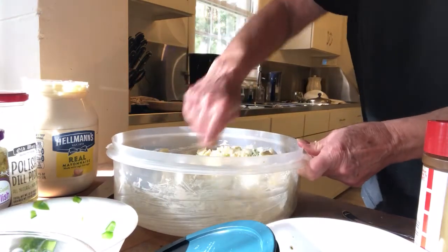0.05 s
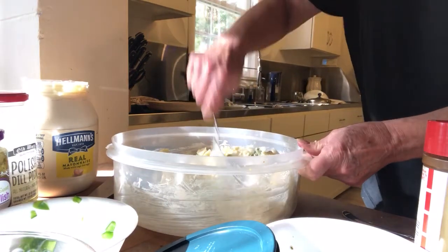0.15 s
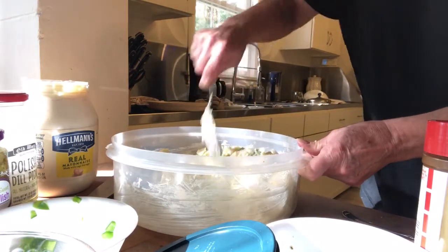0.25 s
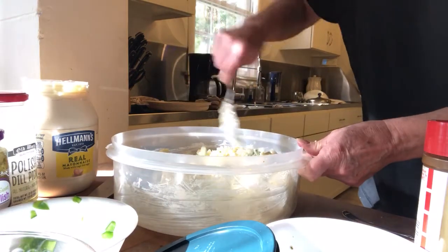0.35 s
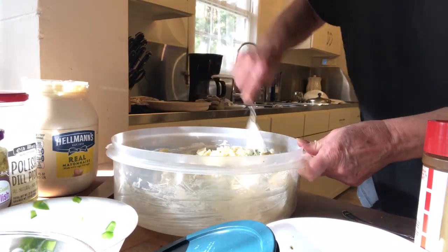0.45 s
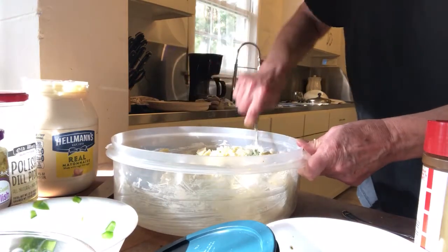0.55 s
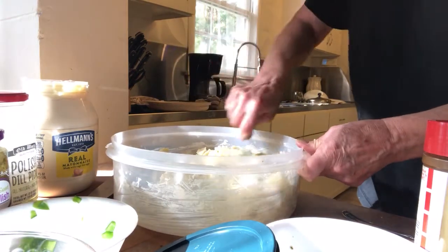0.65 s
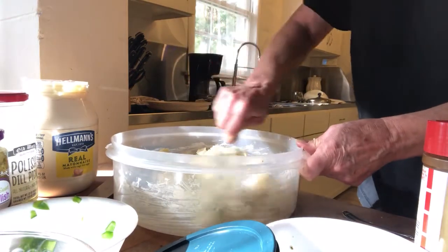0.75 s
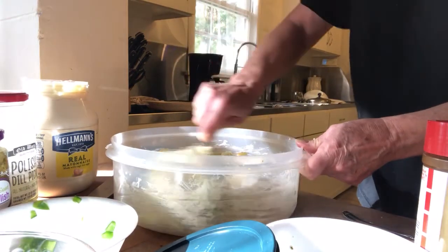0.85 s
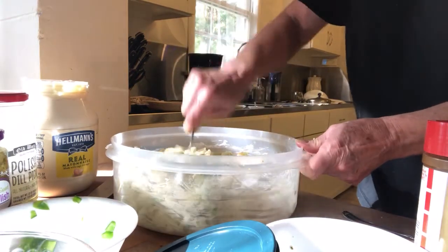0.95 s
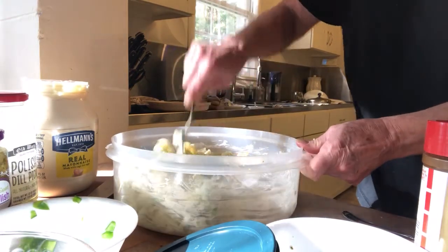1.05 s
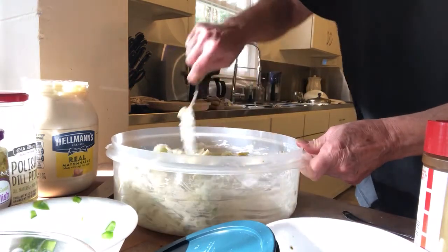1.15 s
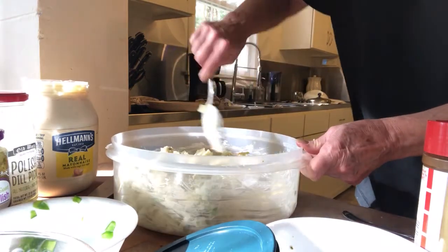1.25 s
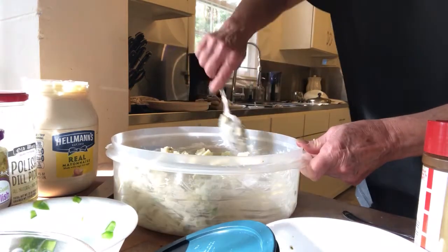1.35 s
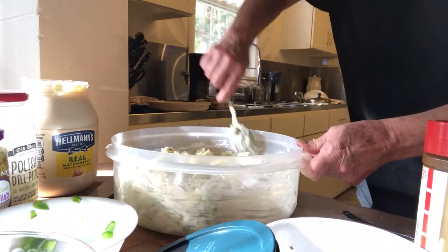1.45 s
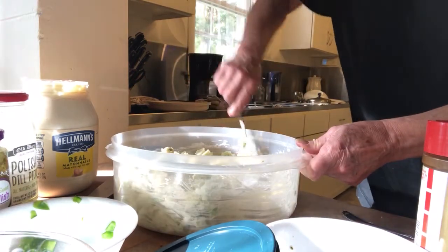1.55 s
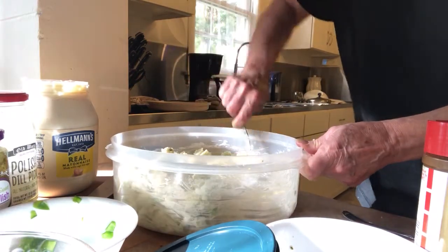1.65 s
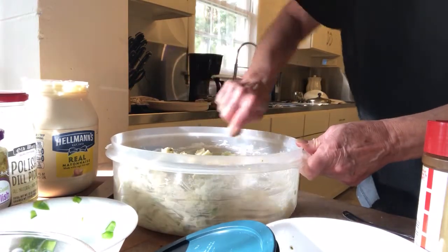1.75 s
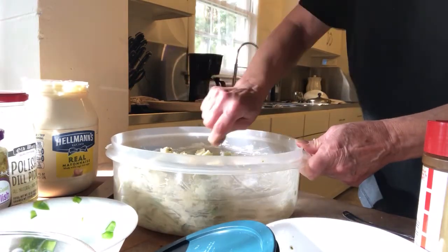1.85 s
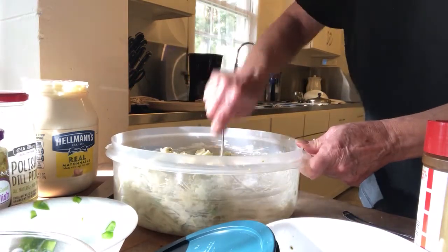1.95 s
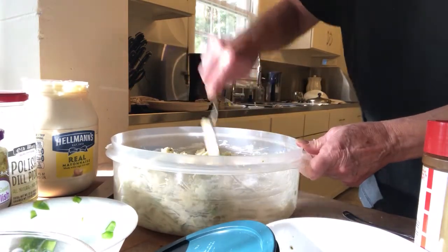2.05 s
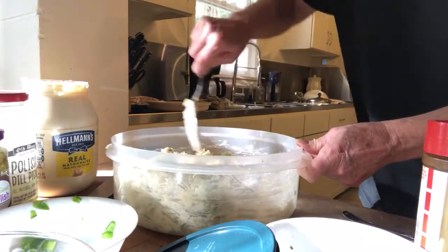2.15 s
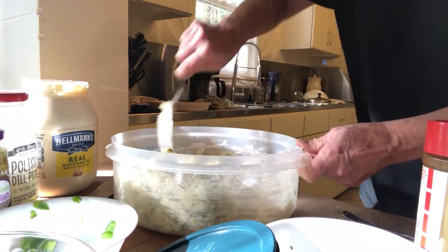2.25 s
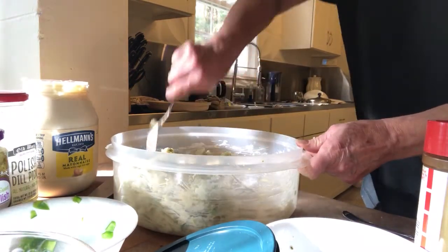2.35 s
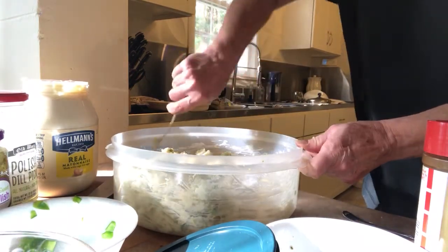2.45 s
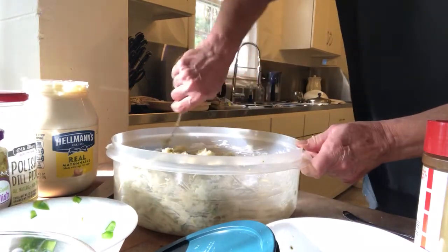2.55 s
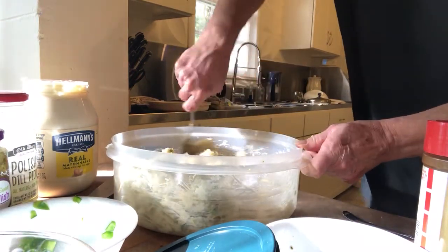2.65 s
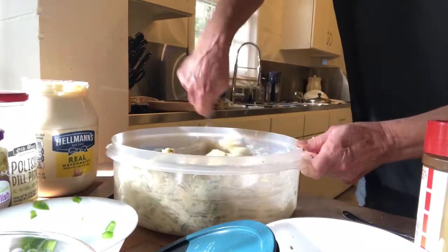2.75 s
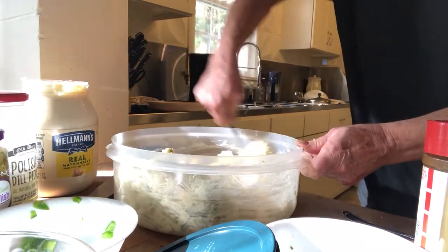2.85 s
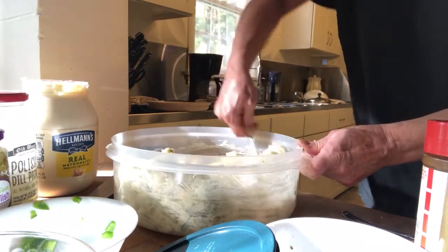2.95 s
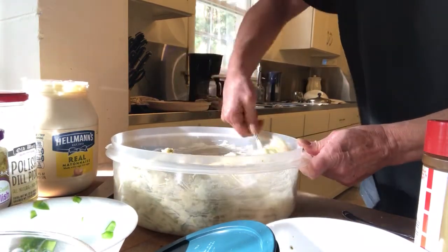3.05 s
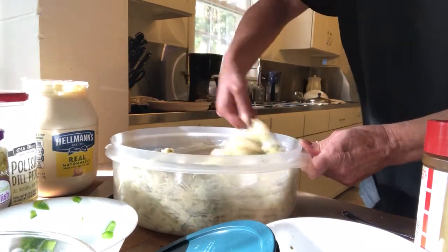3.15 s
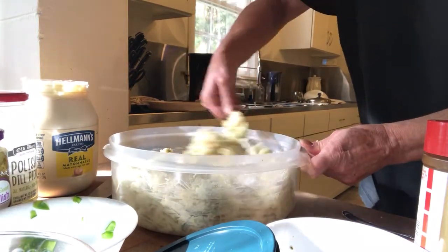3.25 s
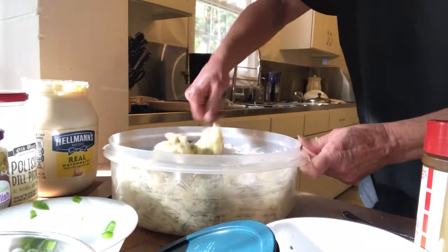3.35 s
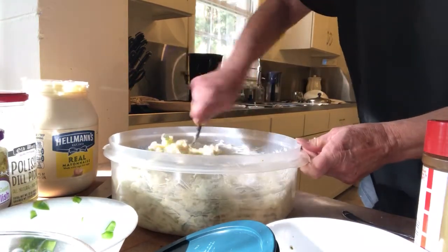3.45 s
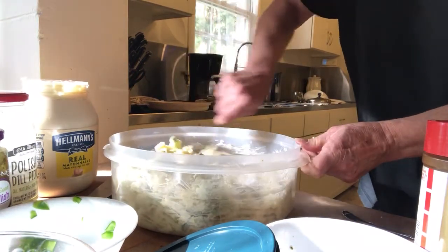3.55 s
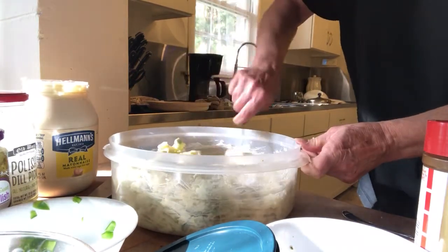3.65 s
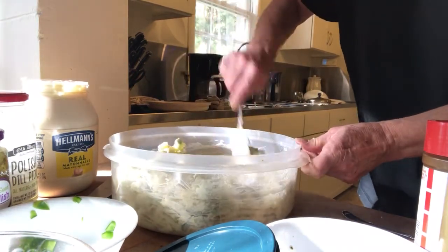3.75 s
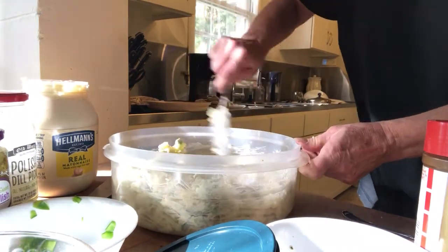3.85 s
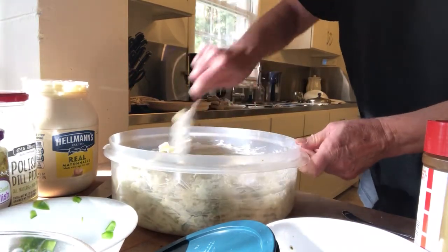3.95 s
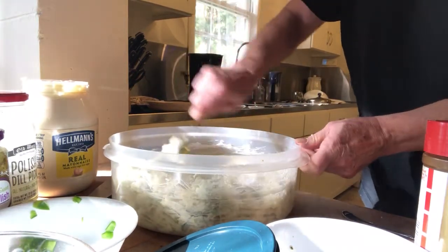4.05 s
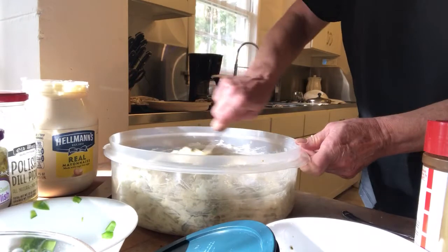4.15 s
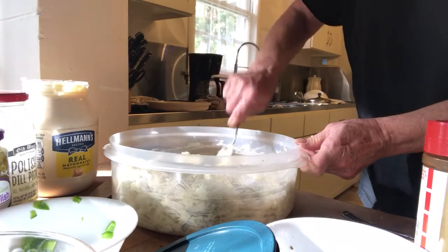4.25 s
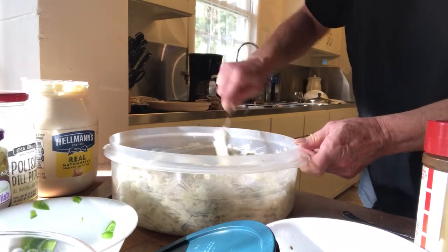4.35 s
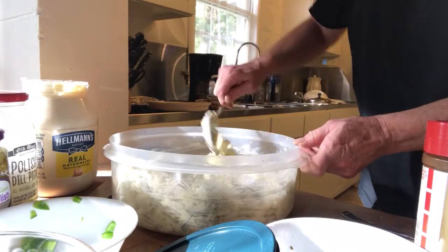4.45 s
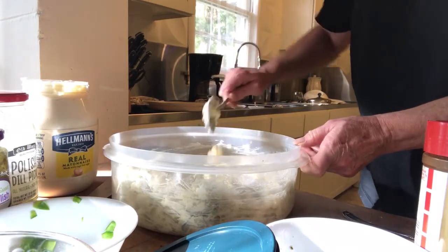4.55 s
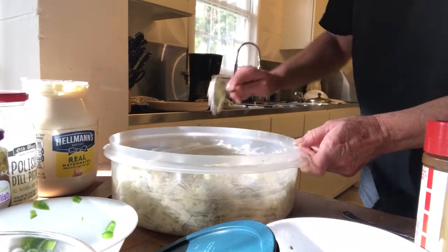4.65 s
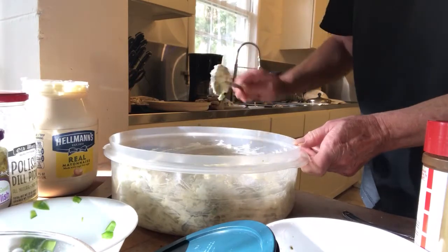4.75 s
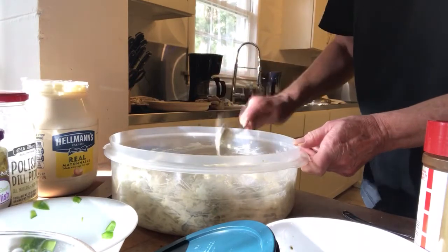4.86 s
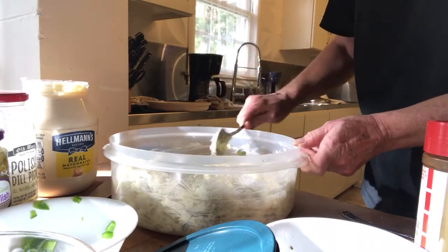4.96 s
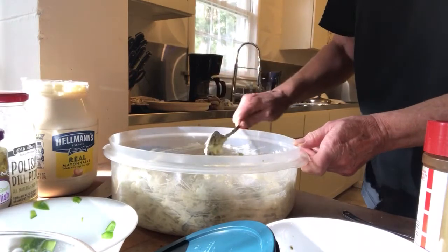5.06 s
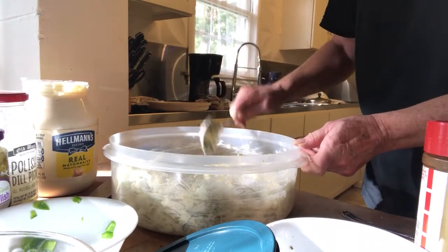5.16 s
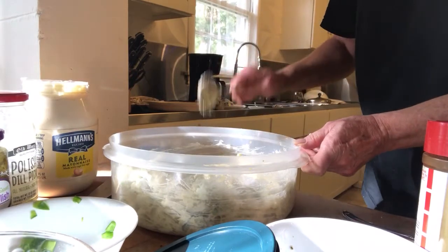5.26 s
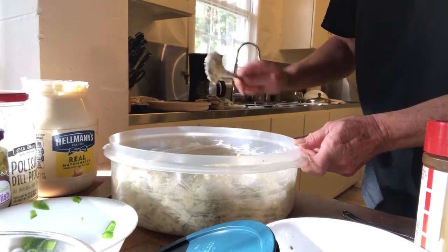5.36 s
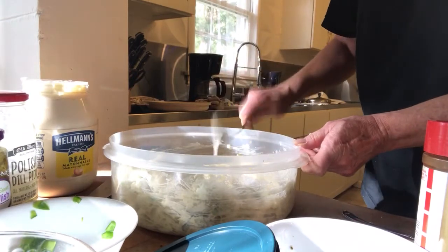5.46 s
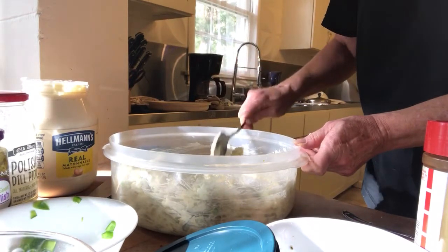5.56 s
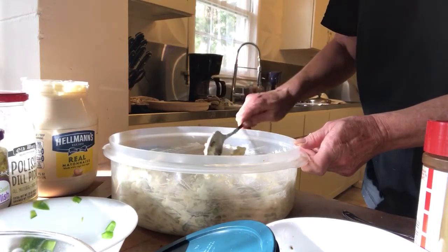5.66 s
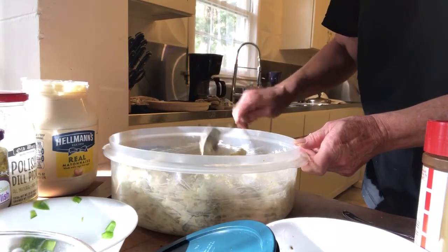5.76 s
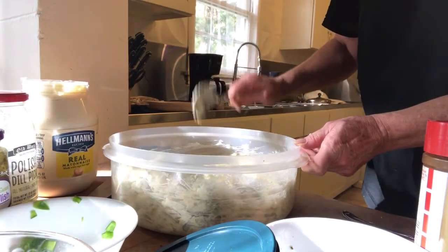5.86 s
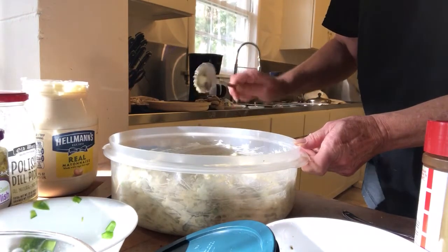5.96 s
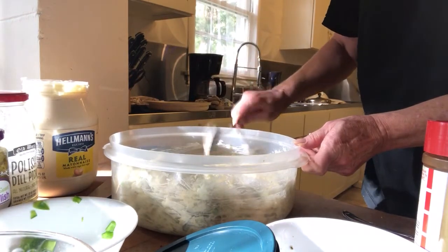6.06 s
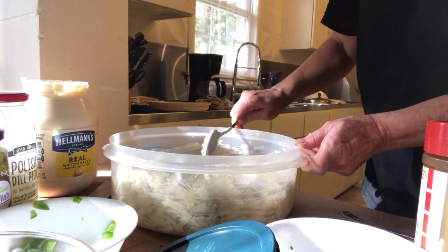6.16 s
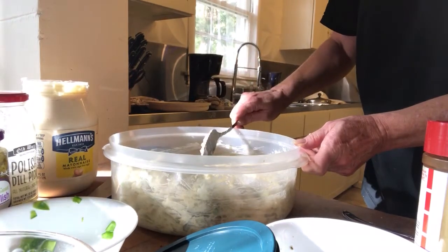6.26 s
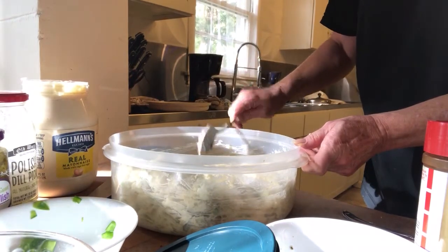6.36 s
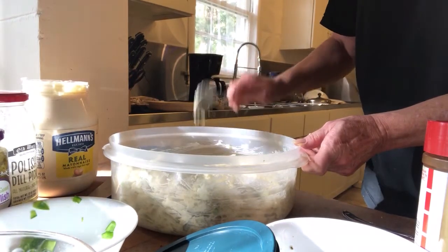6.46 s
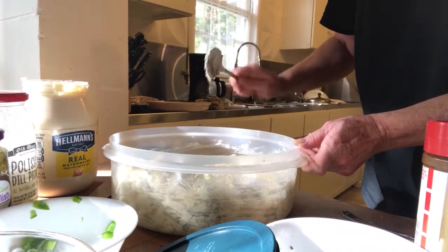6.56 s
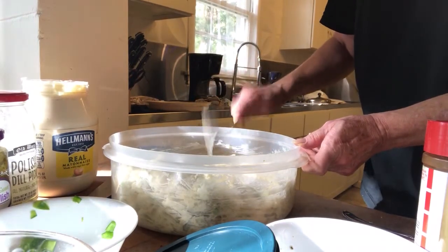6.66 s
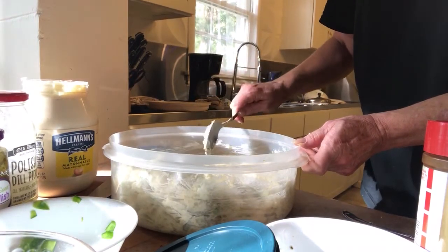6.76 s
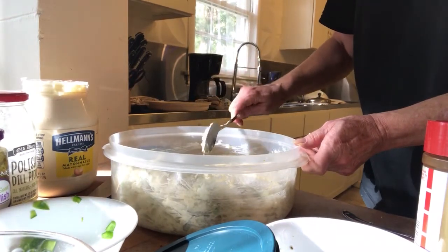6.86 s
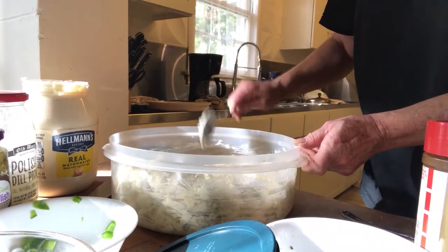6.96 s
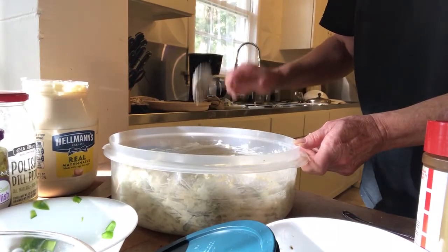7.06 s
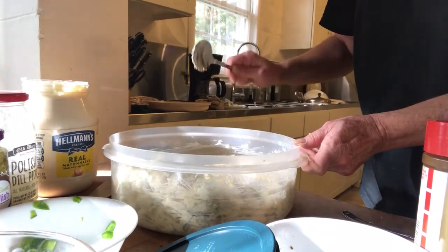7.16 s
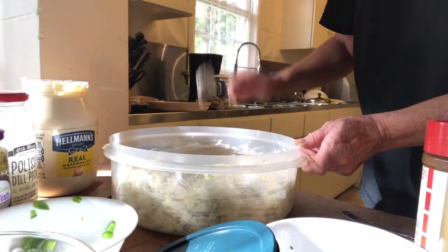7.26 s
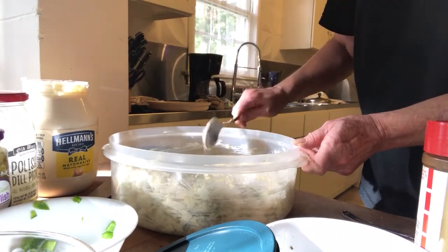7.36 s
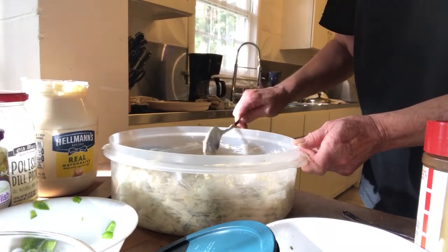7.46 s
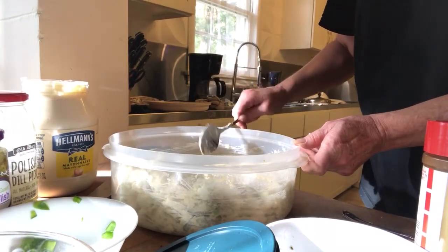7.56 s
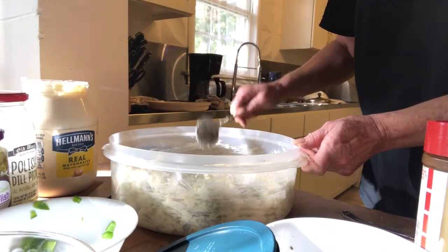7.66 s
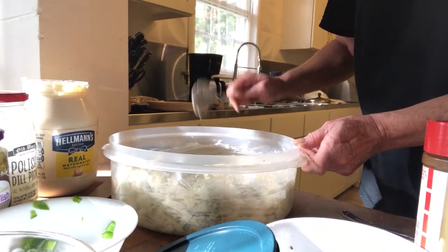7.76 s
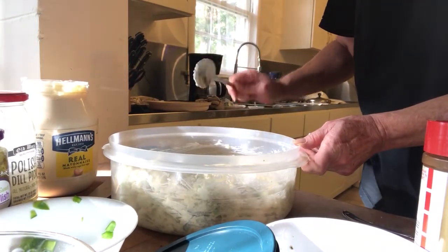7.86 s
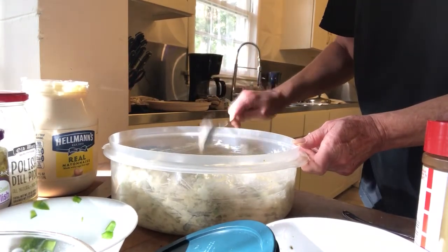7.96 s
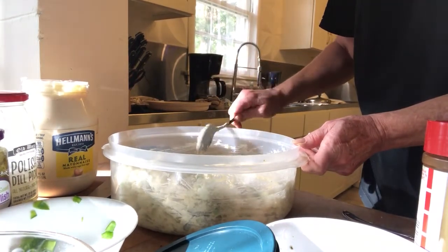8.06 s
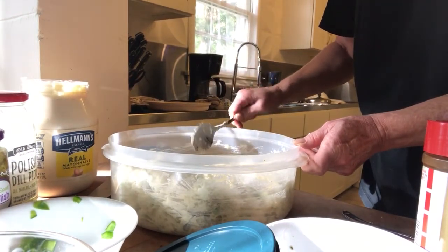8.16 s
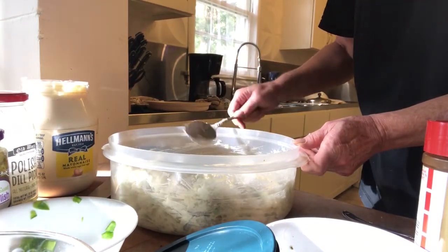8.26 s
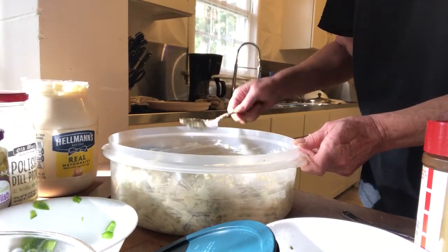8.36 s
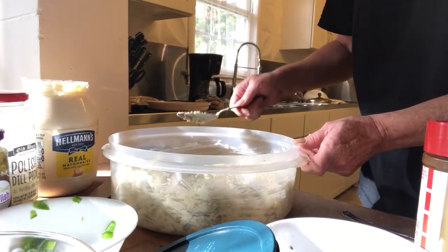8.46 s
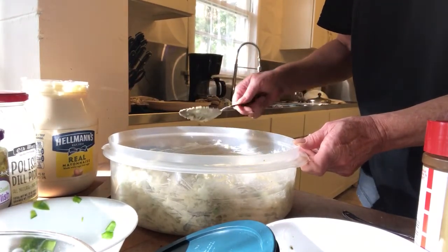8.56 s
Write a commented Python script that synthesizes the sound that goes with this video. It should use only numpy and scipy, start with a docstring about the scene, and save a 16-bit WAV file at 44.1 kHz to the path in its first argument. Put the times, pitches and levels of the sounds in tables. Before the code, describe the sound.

Close by in a kitchen, moist salad is stirred with quiet squishes and sticky smacks, and a metal spoon now and then clacks against the plastic bowl. About halfway through, the stirring stops and six firm, hollow knocks follow as the spoon strikes the rim, most with a light rebound. Each has a short room echo, over soft room air and a low electrical hum.

```python
"""In a kitchen, a metal spoon folds a wet salad in a large plastic bowl steadied by hand on the counter.
The spoon clacks and drags against the bowl's wall while the food squelches and pops. Then the spoon is
knocked clean on the rim six times, bouncing after most blows. Each touch makes the bowl ring briefly.
The hard room echoes and a faint hiss trails each sound, over soft room air and an appliance's hum."""
import sys
import numpy as np
from scipy import signal
from scipy.fft import rfft, irfft, next_fast_len
from scipy.io import wavfile

SR = 44100
rng = np.random.default_rng(int(sys.argv[2]) if len(sys.argv) > 2 else 0)


def wav_out(sig):
    """Save sig, one row per channel (or a flat mono array), as 16-bit PCM at SR to the path in sys.argv[1]."""
    wavfile.write(sys.argv[1], SR, np.round(np.clip(np.atleast_2d(sig).T, -1, 1) * 32767).astype(np.int16))


N = 379127
KNOCK_HZ, CLACK_HZ, CRACK_HZ = 750, 1700, 4200   # the bowl's low, middle and high voices

# Short tones of the full bowl; wider ones die sooner: (pitch [Hz], width [Hz], relative level [dB])
BOWL_TONES = [(320.4, 148, -14), (363.2, 200, -14.5), (510.8, 210, -22.5), (706.3, 179, -14),
              (789, 210, -12), (1187, 165, -19), (1445, 180, -16), (1583, 250, -13.5), (2215, 360, -13.5),
              (2460, 480, -14), (3202, 650, -19), (4230, 860, -25)]
# Longer rings of bowl and counter: (pitch [Hz], relative level [dB], time to fade by 60 dB [s])
LONG_RINGS = [(56, -60.5, 0.25), (86, -36.5, 0.31), (136.4, -43, 0.53), (237.7, -41, 0.37),
              (296, -37, 0.17), (769, -37.5, 0.19), (1260, -44.5, .2), (1504, -46.5, .22)]
# The sharp crack right where the spoon lands: (frequency [Hz], relative level [dB])
CRACK_SPECTRUM = [(2000, -21), (3500, -7), (4400, -4), (4900, -4), (5600, -.5), (8000, -8), (10400, -15),
                  (12000, -13), (15500, -13.5)]


def spoon_on_bowl(travel_s=.0008, scatter_db=1.48, ring_rise_s=.001):
    """Each touch sends a bending wave round the bowl: high tones arrive first, the boom last."""
    size = SR // 3
    out, t, freqs = np.zeros(N), np.arange(size) / SR, np.arange(size // 2 + 1) * SR / size
    for s, drive, sheen_db, pitch, slide_s in rim_knocks() + wall_clacks():
        pitch = np.clip(pitch, .86, 1.12)
        # sheen is the very top of the sound: a clean edge adds it, a coat of food takes it away
        sheen = sheen_db * np.interp(freqs, [6000, 13000], [0, 1])
        crack_gain = from_db(at_hz(drive, CRACK_HZ) + sheen + at_hz(CRACK_SPECTRUM, freqs))
        blow = irfft(rfft(smeared_click(size)) * crack_gain, size) * (1 - t / t[-1])
        for hz, width_hz, db in BOWL_TONES:
            age = np.maximum(t - travel_s * np.sqrt(1000 / hz), 0)
            gain = from_db(db + at_hz(drive, hz) + scatter_db * rng.standard_normal())
            blow += gain * swell(np.pi * width_hz * age) * np.sin(2 * np.pi * hz * pitch * age)
        rise = 1 - np.exp(-t / ring_rise_s)
        for hz, db, fade_s in LONG_RINGS:
            fade = from_db(-60 * t / fade_s)
            blow += from_db(db + at_hz(drive, hz)) * rise * fade * np.sin(2 * np.pi * hz * t)
        add(out, s, signal.fftconvolve(blow, skid(slide_s)))
    return out


# How a firm blow and a loose touch drive (shake) the bowl: (frequency [Hz], boost [dB])
FIRM_DRIVE = [(400, -0.5), (750, .5), (1700, -1.5), (4200, 1)]
LOOSE_DRIVE = [(400, -1.5), (750, .5), (1700, -1.5), (4200, -13.5)]
# Blows on the rim: (time [s], relative level [dB], voice the spot brings out [Hz], its boost [dB],
# sheen [dB], pitch [ratio], time to first bounce [s], bounces [count],
# first bounce against the blow [dB], its brightness [dB per octave])
RIM_BLOWS = [(4.935, 0, 1200, 4.5, -2.5, 1.01, 0.07, 2, -14, -1),
             (5.5422, -1.5, 600, 3.5, -1.5, 0.98, 0.11, 1, -27.5, -6),
             (6.1333, -1, 850, 3, 0.5, 0.99, 0.077, 2, -13, 1.5),
             (6.7474, 0, 2800, 2.5, 1.5, 0.994, 0, 0, 0, 0),
             (7.399, -2, 2600, 6.5, 4, 0.953, .099, 1, -16, -1.5),
             (8.0372, -0.5, 1800, 5, 1.5, 1, 0.077, 2, -6.5, 4)]


def rim_knocks(grip_lead_s=.0228, grip_db=-41, loose_sheen_db=-6.5, rebound=.53):
    """The spoon shifts faintly in the grip, strikes the rim, and usually bounces."""
    touches = []
    for s, db, voice_hz, boost_db, sheen_db, pitch, flight_s, bounces, bounce_db, tilt_db in RIM_BLOWS:
        firm = boosted(FIRM_DRIVE, voice_hz, boost_db)
        loose = boosted(LOOSE_DRIVE, voice_hz, boost_db)
        touches.append(touch(s - grip_lead_s, db + grip_db, 0, loose, loose_sheen_db, pitch))
        touches.append(touch(s, db, 0, firm, sheen_db, pitch))
        for k in range(round(bounces)):   # each further bounce is sooner, weaker and duller
            s += flight_s * rebound ** k
            weaker_db, duller_db = db + bounce_db - 10 * k, tilt_db - 1.5 * k
            touches.append(touch(s, weaker_db, duller_db, loose, loose_sheen_db, pitch))
    return touches


# How a touch on the bowl's wall drives it: (frequency [Hz], boost [dB])
WALL_DRIVE = [(400, -1), (750, -1), (1700, 1.2), (4200, 0.5)]
# Touches while stirring: (time [s], relative level [dB], brightness [dB per octave],
# extra hollow knock [dB], pitch before limiting [ratio], slide time [s])
WALL_TOUCHES = [(0.0914, -33, 1, -5, 1.14, .005), (.71, -17, 6.5, 8.5, 0.913, 0.0026),
                (.8396, -40, 11, 1, 0.99, 0.0055), (.856, -26.5, 9, 2, 1, 0.0087),
                (.8895, -33.5, 8, 2, 1, 0.0081), (1.0009, -40.5, 10.5, 2, 1.23, 0),
                (1.2819, -56.5, -6.5, 11, 0.74, 0.00081), (1.5278, -10, 4.5, -12.5, 1, 0.0022),
                (1.8636, -38.5, 20, 20, 0.98, 0.0043), (1.875, -20.5, 12, 3, 1.01, 0.0067),
                (2.511, -28.5, 5.5, -4, 0.96, 0.011), (2.5799, -41.5, -7.5, -0.5, 0.97, 0),
                (2.9672, -33.5, 13.5, 4.5, 1.04, 0.0074), (3.467, -50, -6, 3.5, 0.9, 0),
                (3.6335, -20, 4.5, 2, 1.02, 0.0033), (3.6776, -17.5, 3.5, -0.5, 1.04, 0.0056),
                (3.7262, -34.5, 4, 1, 0.91, 0.009), (4.242, -36.5, 2, -11, 1.15, 0.01),
                (4.4672, -57, -8, 3, 0.9, 0.0019)]


def wall_clacks(sheen_db=-2, dulling_db_per_s=1100):
    """The spoon meets the wall: bare metal is bright, food in between is dull, sliding loses sheen."""
    touches = []
    for s, db, tilt_db, knock_db, pitch, slide_s in WALL_TOUCHES:
        drive = boosted(WALL_DRIVE, KNOCK_HZ, knock_db)
        touches.append(touch(s, db, tilt_db, drive, sheen_db - dulling_db_per_s * slide_s, pitch, slide_s))
    return touches


def touch(s, db, tilt_db, drive, sheen_db, pitch, slide_s=0):
    """One touch of the spoon; a tilt above zero favours the high tones."""
    tilted = [(hz, db + boost + tilt_db * np.log2(hz / CLACK_HZ)) for hz, boost in drive]
    return s, tilted, sheen_db, pitch, slide_s


def boosted(drive, voice_hz, db, octaves=.64):
    """The spot that the spoon meets brings out one of the bowl's voices."""
    hz = np.geomspace(drive[0][0], drive[-1][0], num=16)
    bump = np.exp(-(np.log2(hz / voice_hz) / octaves) ** 2)
    return list(zip(hz, at_hz(drive, hz) + db * bump))


def smeared_click(length, width_hz=330, count=20):
    """The bowl's shell smears a click: each band of high tones arrives with its own small delay."""
    r = np.exp(-np.pi * width_hz / SR)
    hz = 2000 + 14000 * (np.arange(count) + rng.random(count)) / count
    allpasses = [[r * r, a, 1, 1, a, r * r] for a in -2 * r * np.cos(2 * np.pi * hz / SR)]
    return signal.sosfilt(allpasses, signal.unit_impulse(length) + 1e-18)


def skid(slide_s, slip_s=.0013, count=24):
    """A sliding spoon catches about once a millisecond, ever more weakly."""
    delays = slip_s * (np.arange(count) + rng.uniform(.64, 1.8, count))
    strengths = np.exp(-(delays / (abs(slide_s) + 1e-9)) ** 2)
    catches = signal.unit_impulse(round(delays.max() * SR) + 1)
    catches[np.round(delays * SR).astype(int)] += rng.choice([-1, 1], count) * strengths
    return catches / np.linalg.norm(catches)


# The tone of mashed food and of crackling dressing: (frequency [Hz], relative level [dB])
MASH_SPECTRUM = [(250, -16), (500, -1.5), (1000, 4.5), (1700, 3), (3000, 3), (5000, -10.5), (9000, -23.5)]
CRACKLE_SPECTRUM = [(1500, -14), (3000, -3), (6000, -2.5), (8500, -8), (10400, -11.5), (13000, -6),
                    (15500, -9)]
# Spoon strokes: (time of full pressure [s], hold [s], mash before trim [dB], crackle before trim [dB])
SALAD_STROKES = [(0, 0.036, -56.5, -56), (.78, 0.15, -55, -62), (1.7, 0.16, -57, -61.5),
                 (2.54, 0.33, -59, -64.5), (3.15, 0.4, -70, -66.5), (3.621, 0.083, -67, -62.5),
                 (4.241, 0.023, -62, -63.5)]


def salad(press_db_per_s=80, ease_db_per_s=78, trim_db=-3):
    """Each stroke presses in, holds and eases: soft pieces crush while films of dressing tear."""
    t, mashing, tearing = np.arange(N) / SR, 0, 0
    for s, hold_s, mash_db, crackle_db in SALAD_STROKES:
        before_s, after_s = np.maximum(s - t, 0), np.maximum(t - s - hold_s, 0)
        pressure = from_db(-press_db_per_s * before_s - ease_db_per_s * after_s)
        mashing = np.maximum(mashing, pressure * from_db(mash_db + trim_db))
        tearing = np.maximum(tearing, pressure * from_db(crackle_db + trim_db))
    return (mashing * tiny_bursts(MASH_SPECTRUM, per_s=1400, spread_db=1, width=.15)
            + tearing * tiny_bursts(CRACKLE_SPECTRUM, per_s=1300, spread_db=5.5, width=.22))


def tiny_bursts(spectrum, per_s, spread_db, width, count=14):
    """Bits of food burst at random, big and small, each ringing briefly at one of several pitches."""
    out = np.zeros(N)
    for hz in np.geomspace(spectrum[0][0], min(spectrum[-1][0], SR / 2), count):
        starts = np.flatnonzero(rng.random(N) < per_s / count / SR)
        sizes = from_db(spread_db * np.minimum(rng.exponential(1, N)[starts], 4))
        clicks = np.zeros(N)
        clicks[starts] = sizes * (-1) ** starts
        out += resonate(clicks, hz, width * hz)
    return coloured(out, spectrum)


# Pockets of sticky food letting go of the spoon, mostly loud ones, with a few faint ticks: (time [s], relative
# level [dB], pitch [Hz])
PLACED_SMACKS = [(.624, -47, 6240), (.862, -43.5, 6900), (1.625, -45.5, 4800), (2.218, -47.5, 5260),
                 (2.387, -59, 1080), (2.926, -39, 13000), (2.932, -41, 2770), (3.493, -41, 14000),
                 (3.609, -50.5, 10870), (4.076, -54, 5300), (4.526, -56, 2150), (4.561, -49.5, 5400),
                 (4.728, -61.5, 2200), (7.162, -55.5, 2190)]


def smacks(rise_cycles=1.8, trim_db=-1, roughness=.78):
    """Wet pockets snap open and ring for a few cycles."""
    out, t = np.zeros(N), np.arange(SR // 50) / SR
    for s, db, hz in PLACED_SMACKS + small_smacks():
        rasp = rms_one(resonate(rng.standard_normal(len(t)), hz, hz / 2))
        pop = np.sin(2 * np.pi * hz * t) + roughness * rasp
        add(out, s, from_db(db + trim_db) * swell(t * hz / rise_cycles) * pop)
    return out


def small_smacks(per_stroke=3, scatter_s=.09, relative_db=-59.5, spread_db=7, middle_hz=7900):
    """More pockets, mostly faint, open at random around each stroke."""
    pockets = []
    for s, hold_s, _, _ in SALAD_STROKES:
        for late, big, high in rng.standard_normal((per_stroke, 3)):
            time_s = s + hold_s * rng.random() + scatter_s * late
            octaves = .46 * np.clip(high, -2, 2)
            pockets.append((time_s, relative_db + spread_db * big, middle_hz * 2 ** octaves))
    return pockets


# Groans of the bowl's wall: (time [s], length [s], pitch [Hz], width [Hz], level [dB])
WALL_GROANS = [(0, 0.11, 470, 408, -60.5), (0.88, 0.047, 580, 250, -58), (1.625, 0.096, 460, 330, -58),
               (1.638, 0.076, 980, 301, -62), (2.503, 0.032, 1590, 216, -58),
               (2.552, 0.18, 1570, 300, -64.5), (2.719, 0.36, 878, 185, -68.5),
               (3.678, .1, 1130, 695, -53.5), (3.812, 0.45, 402, 89, -70), (4.2, .08, 563, 250, -67)]


def drags(slips_per_s=700):
    """Food dragged along the wall sticks and slips, making the wall groan at one pitch."""
    out = np.zeros(N)
    for s, length_s, hz, width_hz, db in WALL_GROANS:
        slips = (rng.random(SR) < slips_per_s / SR) * rng.standard_normal(SR)
        groan = resonate(resonate(slips, hz, width_hz), hz, width_hz)[-round(length_s * SR):]
        add(out, s, from_db(db) * rms_one(groan * signal.windows.tukey(len(groan), .5)))
    return out


# The room's fading wash of sound: (frequency [Hz], relative level [dB], time to fade by 60 dB [s])
ROOM_TAIL = [(61.47, -5.5, 0.29), (164.8, 0, 0.36), (322, -8, 0.64), (530, -6, .5), (770, -8, 0.61),
             (1020, 0, 0.65), (2060, -8, 0.53), (3580, -0.5, .45), (6070, 1.5, 0.48), (10130, 1, 0.33),
             (16040, -4.5, .32)]
# First echoes off wall, ceiling and cupboards: (delay [s], level [dB])
FIRST_ECHOES = [(.009, -24.5), (0.0196, -20.5), (.0255, -23), (.0395, -23.5)]


def kitchen_echo(x, tail_db=-6, build_s=.0018):
    """Hard surfaces send back a few clear echoes and a blurred tail whose highest tones fade early."""
    t = np.arange(SR) / SR
    white, hz = rfft(rng.standard_normal(SR)), np.arange(SR // 2 + 1)
    edges = np.geomspace(40, SR / 2, 28)
    rise = 1 - np.exp(-(t / build_s) ** 2)
    response = np.zeros(SR)
    for low, high in zip(edges, edges[1:]):
        centre = np.sqrt(low * high)
        band = irfft(white * ((hz >= low) & (hz < high)), SR)
        fade = from_db(-60 * t / at_hz(ROOM_TAIL, centre, column=2))
        gain = from_db(tail_db + at_hz(ROOM_TAIL, centre)) * np.sqrt(2 * (high - low)) / SR
        response += gain * rms_one(band * fade * rise)
    for s, db in FIRST_ECHOES:
        response[round(s * SR)] += from_db(db)
    return signal.fftconvolve(x, response)[:N]


def lingering_hiss(x, level_db=-18, length_s=.41, low_hz=6000):
    """A faint, even hiss hangs on after each sound and stops short."""
    size = round(length_s * SR)
    highs_only = signal.butter(2, low_hz, "high", fs=SR, output="sos")
    hiss = signal.sosfilt(highs_only, rng.standard_normal(SR)[:size])
    return from_db(level_db) * signal.fftconvolve(x, hiss / np.sqrt(size))[:N]


# The soft rush of room air: (frequency [Hz], relative level [dB])
AIR_SPECTRUM = [(15, -37.5), (25, -7.5), (53, -2.5), (92, -10.5), (123, -5.5), (153, -12.5), (242, -8),
                (394, -15), (503, -17.5), (545, -17.5), (1400, -25.5), (2220, -25.5), (3080, -31.5),
                (3340, -28.5), (16000, -43)]
# An appliance's steady tones: (pitch [Hz], level [dB])
HUM_TONES = [(120, -76.5), (240, -74)]


def air_and_hum(air_db=-64.5):
    """Room air rushes softly while mains power makes an appliance hum."""
    t = np.arange(N) / SR
    hum = sum(np.sqrt(2) * from_db(db) * np.sin(2 * np.pi * (hz * t + rng.random()))
              for hz, db in HUM_TONES)
    return hum + from_db(air_db) * coloured(rng.standard_normal(N), AIR_SPECTRUM)


def from_db(db):
    """Turn decibels into a number to multiply by."""
    return 10 ** (np.asarray(db) / 20)


def rms_one(x):
    """Scale a sound so its average strength (rms) is 1."""
    return x / np.sqrt(np.mean(x ** 2) + 1e-20)


def at_hz(points, hz, column=1):
    """Read a table at any frequency, gliding between its rows."""
    table = np.array(points)
    return np.interp(np.log(np.maximum(hz, 1)), np.log(table[:, 0]), table[:, column])


def coloured(x, spectrum):
    """Shape a sound's lows and highs, then scale it to strength 1."""
    size = next_fast_len(len(x))
    hz = np.arange(size // 2 + 1) * SR / size
    return rms_one(irfft(rfft(x, size) * from_db(at_hz(spectrum, hz)), size)[:len(x)])


def resonate(x, hz, width_hz):
    """Make a sound ring at one pitch; a smaller width rings longer."""
    r = np.exp(-np.pi * width_hz / SR)
    feedback = [1, -2 * r * np.cos(2 * np.pi * hz / SR), r * r]
    return signal.lfilter(np.array([1, 0, -1]) * (1 - r * r) / 2, feedback, x + 1e-18)


def swell(age):
    """Rise quickly to 1 at age 1, then die away."""
    age = np.maximum(age, 0)
    return age * np.exp(1 - age)


def add(out, s, sound):
    """Mix a short sound in at s seconds."""
    start = max(round(s * SR), 0)
    out[start:start + len(sound)] += sound[:N - start]


def scene():
    """The bowl close by, the kitchen around it."""
    bowl = spoon_on_bowl() + salad() + drags() + smacks()
    return (bowl + kitchen_echo(bowl) + lingering_hiss(bowl) + air_and_hum())[None]


def record(dry, ceiling=.75, low_cut_hz=42, high_cut_hz=16100):
    """Cut the deep bass, round off the loudest peaks, then cut the very top."""
    thinned = signal.sosfilt(signal.butter(4, low_cut_hz, "high", fs=SR, output="sos"), dry)
    rounded = thinned / (1 + (thinned / ceiling) ** 6) ** (1 / 6)
    return signal.sosfilt(signal.ellip(10, .2, 80, high_cut_hz, fs=SR, output="sos"), rounded)


dry = scene()
out = record(dry)
wav_out(out)
```